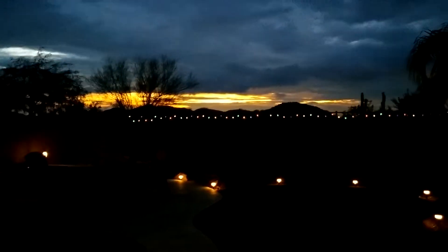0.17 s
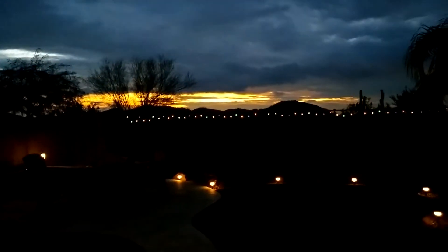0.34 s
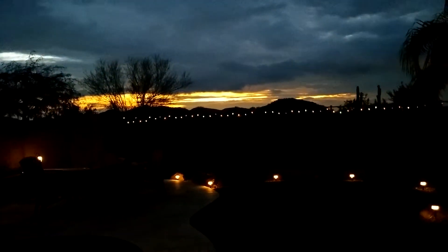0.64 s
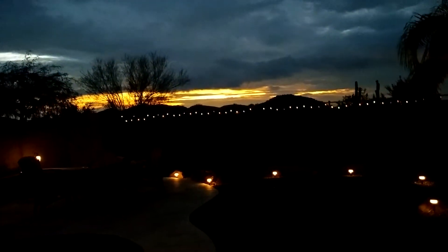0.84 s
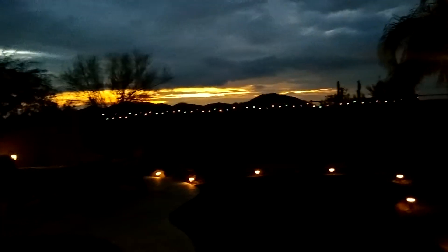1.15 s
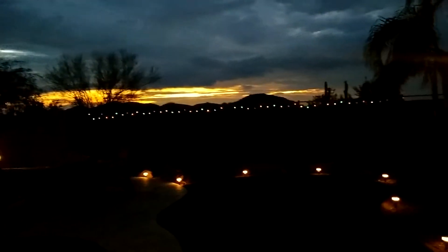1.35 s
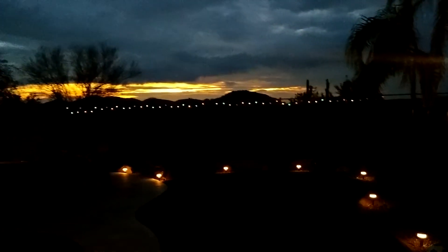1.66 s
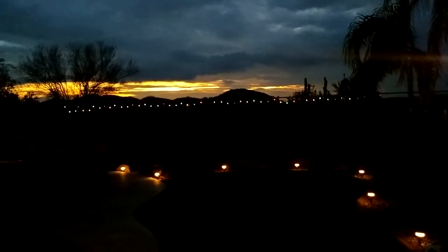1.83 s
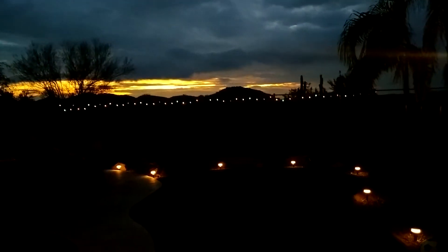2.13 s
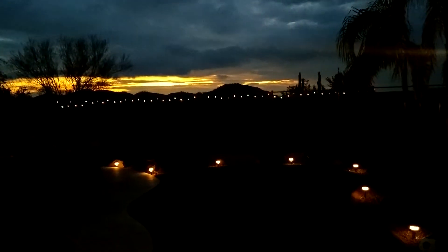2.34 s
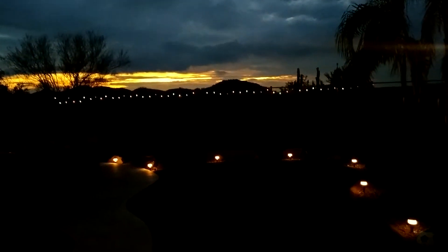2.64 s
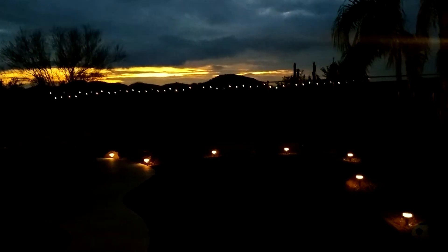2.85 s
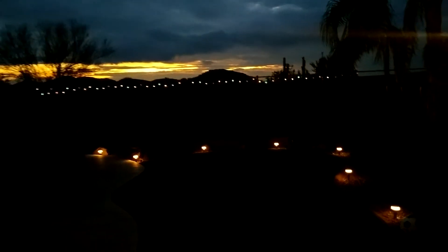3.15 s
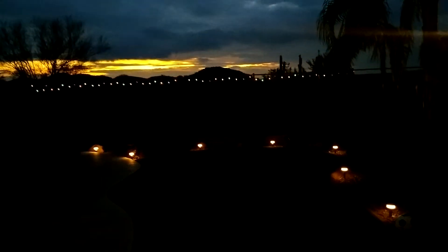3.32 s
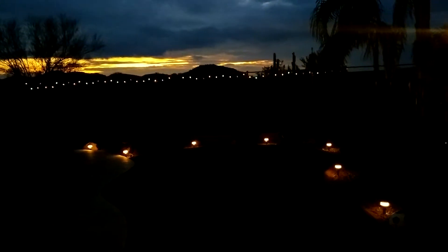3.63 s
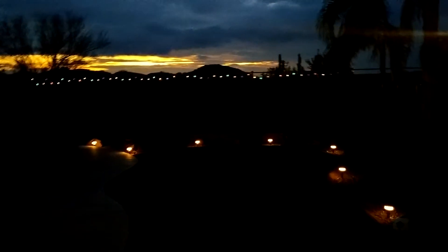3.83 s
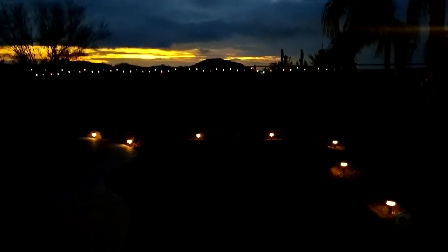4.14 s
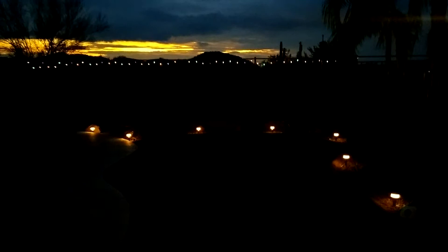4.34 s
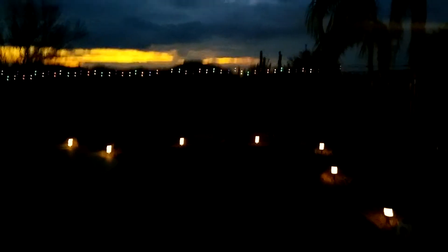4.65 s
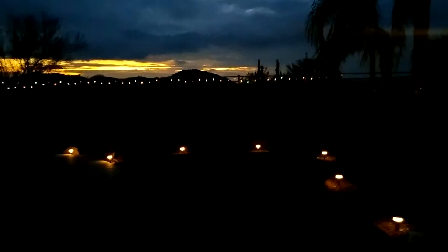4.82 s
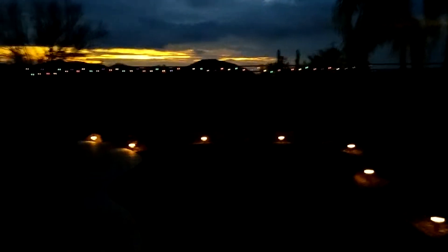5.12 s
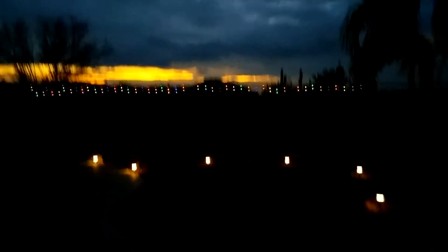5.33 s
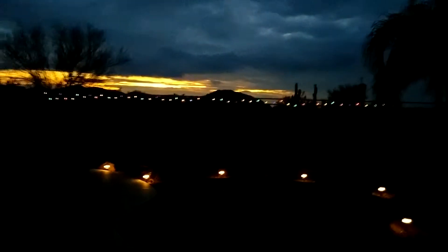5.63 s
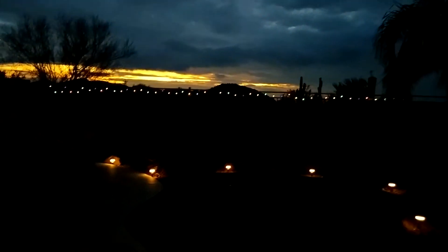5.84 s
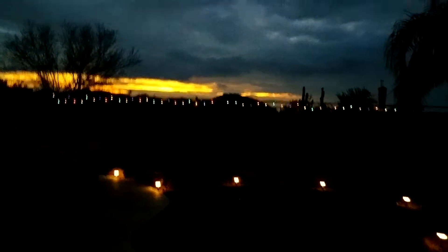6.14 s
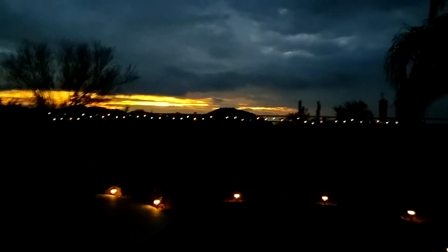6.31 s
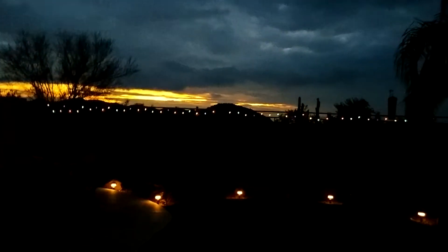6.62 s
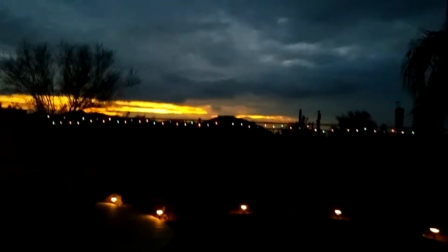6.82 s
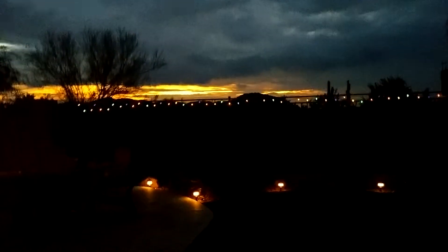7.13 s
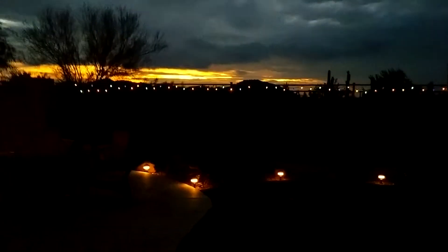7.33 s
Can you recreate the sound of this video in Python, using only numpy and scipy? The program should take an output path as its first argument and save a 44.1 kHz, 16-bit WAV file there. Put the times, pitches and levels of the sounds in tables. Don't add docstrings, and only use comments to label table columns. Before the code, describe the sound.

In a dark backyard, one short climbing coyote call fades to faint night noise, then a stronger yodelling howl echoes amid handling ticks.

```python
import sys
import numpy as np
from scipy import signal
from scipy.fft import rfft, irfft, next_fast_len
from scipy.io import wavfile
from scipy.ndimage import uniform_filter1d

SR = 44100
rng = np.random.default_rng(int(sys.argv[2]) if len(sys.argv) > 2 else 0)


def generate_wav(signal):
    frames = np.transpose(np.atleast_2d(signal))
    scaled = np.clip(frames, -1, 1) * 32767
    pcm = np.round(scaled).astype(np.int16)
    wavfile.write(sys.argv[1], SR, pcm)


def volts_from_decibels(level):
    exponent = np.asarray(level, float) / 20
    return 10 ** exponent


N = 329427

# frequency in Hz, left minus right in dB, lead of the left in radians.
PORTS_WAVER = [(700, 1.8, .45), (1400, 2.5, -.4), (2000, 3, -2.2), (3000, 0, -4.6)]


def unit(x):
    return x / np.sqrt(np.mean(x ** 2))


def curve(rows, outside_db=-120):
    s, *columns = np.transpose(rows)
    return [np.interp(np.arange(N) / SR, s, c, outside_db, outside_db) for c in columns]


def shape_db(points, hz):
    f, db = np.transpose(points)
    return np.interp(np.log(np.maximum(hz, 1)), np.log(f), db)


def walk(rate, size=N):
    k = int(SR / rate)
    steps = np.repeat(rng.standard_normal(size // k + 1), k)
    return 1.28 * uniform_filter1d(uniform_filter1d(steps, k), k)[:size]


def bumps(s, rows):
    middle, half, *sizes = np.transpose(rows)
    return np.array(sizes) @ np.exp(-((s - middle[:, None]) / half[:, None]) ** 2)


def noise(points, alike_hz, wind_hz, flicker_db, count):
    size = next_fast_len(N)
    hz = np.arange(1, size // 2 + 2) * SR / size
    alike = .75 / (1 + (hz / alike_hz) ** 2) / (1 + (wind_hz / hz) ** 2)
    white = rfft(rng.standard_normal((2, size)))
    mid, side = white * volts_from_decibels(shape_db(points, hz)) * np.sqrt([1 + alike, 1 - alike])
    late = np.exp(-2j * np.pi * hz * .00013)
    pair = np.array([mid + side, (mid - side) * late])
    edges = np.geomspace(points[0][0], points[-1][0], count + 1)
    out = np.zeros((2, N))
    for a, b in zip(edges, edges[1:]):
        band = irfft(pair * ((hz >= a) & (hz < b)), size)[:, :N]
        out += volts_from_decibels(flicker_db * walk(9)) * band
    return unit(out)


def suppressor():
    # opens at in seconds, shuts at in seconds, hiss level in dB, last level in dB,
    # release time for 20 dB in seconds.
    openings = [
        (0.775, 0.896, -86, -75.5, .01),
        (0.89, 1.203, -74.5, -73, .012),
        (1.21, 1.604, -82, -81, 0.44),
        (5.36, 5.39, -100, -88, 0.042),
        (5.51, 5.53, -87, -86.5, 0.11),
        (5.665, 6.175, -68.5, -66.5, 0.55),
        (6.3, 6.649, -71, -77, 0.095),
        (6.68, 6.798, -82, -91, .02),
        (6.925, 7.256, -75.5, -81, 0.047),
        (7.312, 7.47, -79.5, -80.5, .05),
    ]
    opening_s, full_db = 0.027, -67
    t = np.arange(N) / SR
    ramps = []
    for a, b, db, end_db, fade in openings:
        times = [a - 3 * opening_s, a, b, b + 3 * fade]
        ramps.append(np.interp(t, times, [db - 60, db, end_db, end_db - 60]))
    return np.max(ramps, axis=0) - full_db


def quiet_night():
    # frequency in Hz, level in dB per Hz.
    night_colour = [(210, -38), (350, -5), (480, -15), (727, -5.5), (850, -15), (1500, -15.5), (2300, -18),
                    (3700, -20), (6000, -21.5), (9000, -19), (11000, -21), (15600, -24)]
    return noise(night_colour, 650, 30, 1.1, count=10) * volts_from_decibels(-74.5)


def traffic_and_wind(gain_db):
    # frequency in Hz, level in dB per Hz.
    traffic_colour = [(65, -45), (110, -2.5), (184, -1), (419, -13.5), (465, -9), (553, -13), (811, -17.5),
                      (977, -23.5), (1570, -29.5), (2160, -25), (2600, -31), (3380, -57.5), (5720, -120)]
    # frequency in Hz, level in dB per Hz.
    gust_colour = [(25, -27), (45, -5.5), (70, -1.5), (100, -4.5), (140, -20), (250, -33.5)]
    # time in seconds, level in dB.
    drift = [(0.0, -46.5), (0.85, -48), (1.4, -42), (1.77, -51), (1.95, -55), (3.0, -55.5), (3.55, -59),
             (4.1, -58), (4.8, -59.5), (5.35, -53.5), (6.0, -53.5), (6.5, -45.5), (6.85, -52), (7.47, -54)]
    # time in seconds, half width in seconds, added
    # rumble in dB, # added wind in dB.
    puffs = [(0.92, .03, 2, -6), (1.14, 0.033, 2.5, -2), (2.962, .03, 7, 17.5), (3.33, 0.074, -2.5, 17.5),
             (3.669, 0.067, 6, 11), (5.78, .04, 5.5, 5), (6.45, 0.053, 4.5, 12), (6.63, 0.047, 8, 15),
             (6.93, 0.019, 12, -3), (7.089, 0.078, -1, 11.5), (7.28, 0.042, 7, 7)]
    rumble_db = curve(drift)[0] + gain_db
    rumble_puff_db, wind_puff_db = bumps(np.arange(N) / SR, puffs)
    traffic = noise(traffic_colour, 2000, 40, 1.8, count=8) * volts_from_decibels(rumble_db + rumble_puff_db)
    wind_db = -68.5 + 1.2 * (rumble_db + 63.5)
    return traffic + noise(gust_colour, 900, 41, 1.8, count=2) * volts_from_decibels(wind_db + wind_puff_db)


def hiss(gate_db):
    # frequency in Hz, level in dB per Hz.
    hiss_colour = [(300, -11), (500, -4.5), (1000, -7), (1600, -13.5), (2400, -12.5), (3500, -20),
                   (6000, -22), (9000, -18.5), (12000, -26), (16000, -26)]
    return noise(hiss_colour, 700, 30, 0.88, count=10) * volts_from_decibels(gate_db - 53.0)


def voice(s, hz, db, second_db, third_db, mouth, tremor_db):
    shake = [tremor_db * walk(45)[(s * SR).astype(int)] for _ in range(3)]
    second_db = second_db + shape_db(mouth, 2 * hz) + 2 * shake[1]
    third_db = third_db + shape_db(mouth, 3 * hz) + 2 * shake[2]
    return np.transpose([s, hz, db + shake[0], second_db, third_db])


def howl(notes, throat, jitter, rough, rasp_db):
    s, *columns = notes.T
    i = np.arange(int(s[0] * SR), int(s[-1] * SR))
    size = len(i)
    hz, first_db, second_db, third_db = (uniform_filter1d(np.interp(i / SR, s, c), size=220) for c in columns)
    phase = 2 * np.pi * np.cumsum(hz * (1 + jitter * walk(120, size))) / SR
    effort_db = uniform_filter1d(np.maximum(second_db, third_db), size=2500)
    stack = volts_from_decibels(first_db) * np.sin(phase)
    overtones_db = [second_db, third_db] + [effort_db + shape_db(throat, k * hz) for k in range(4, 15)]
    for k, db in enumerate(overtones_db, 2):
        smear = np.minimum(rough * np.sqrt(k / 2), .95)
        blur = (walk(110, size) + 1j * walk(110, size)) / np.sqrt(2)
        flutter = np.sqrt(1 - smear ** 2) + smear * blur
        stack += volts_from_decibels(db) * np.imag(flutter * np.exp(1j * (k * phase + k * k)))
    air_hz = np.arange(size // 2 + 1) * SR / size
    breath = rfft(rng.standard_normal(size)) * volts_from_decibels(shape_db(throat, air_hz)) * (air_hz > 900)
    air = unit(irfft(breath, size)) * volts_from_decibels(effort_db + rasp_db)
    out = np.zeros(N)
    out[i] = np.sqrt(2) * (stack + air) * signal.windows.tukey(size, 260 / size)
    return out


def rising_howl():
    # time in seconds, pitch in Hz, effort in dB, mouth brightness in dB.
    rise = [
        (0.775, 489.4, -51, -55),
        (0.799, 526, -35, -47.5),
        (0.84, 645, -37, -44),
        (0.875, 692, -23, -42),
        (0.901, 726, -21, -48),
        (0.905, 726, -28, -44),
    ]
    leap = [
        (0.914, 1170, -33, -46),
        (0.94, 1262, -35, -38),
        (0.976, 1287, -37, -39),
        (0.986, 1045, -31, -41),
        (1.001, 1050, -42, -42),
    ]
    hold = [
        (1.018, 1236, -29, -45),
        (1.046, 1256, -34.5, -40.5),
        (1.09, 1290, -41.5, -47),
        (1.14, 1252, -30, -47.5),
        (1.2, 1284, -44, -54.5),
        (1.44, 1280, -36.5, -56.5),
        (1.552, 1205, -36.5, -57),
    ]
    fall = [
        (1.563, 1080, -38, -70),
        (1.574, 800, -37, -56),
        (1.615, 830, -39, -66),
        (1.63, 860, -65, -80),
    ]
    # frequency in Hz, level in dB.
    mouth = [(1050, -1), (1280, -12), (1480, -5), (1800, -2), (2150, -4), (2550, 0), (3150, -12),
             (3700, -28)]
    # frequency in Hz, level in dB.
    throat = [(1300, -4), (2000, -6), (2500, -14), (3200, -16), (4100, -19), (4800, -32), (5700, -29),
              (6400, -17), (7000, -21), (7700, -29), (8300, -34), (8900, -22), (10000, -42), (14000, -70)]
    at, *columns = np.vstack([rise, leap, hold, fall]).T
    s = np.arange(at[0], at[-1], 1 / 1000)
    hz, db, bright_db = (np.interp(s, at, c) for c in columns)
    line = voice(s, hz, db, bright_db, bright_db, mouth, tremor_db=2.5)
    return howl(line, throat, jitter=.002, rough=.3, rasp_db=-14)


def arrive(x, ports):
    size = next_fast_len(N)
    f, db, lead = np.transpose(ports)
    hz = np.arange(size // 2 + 1) * SR / size
    half = volts_from_decibels(np.interp(hz, f, db) / 2) * np.exp(.5j * np.interp(hz, f, lead))
    both = np.maximum(abs(half + 1 / half) / 2, .45)
    return irfft(rfft(x, size) * np.array([half, 1 / half]) / both, size)[:, :N]


def yard(x):
    t60_s, level_db = 0.49, -5.5
    t = np.arange(int(.9 * SR)) / SR
    sparse = rng.random((3, len(t))) < .03
    shared, left, right = rng.standard_normal((3, len(t))) * sparse
    pair = np.array([shared + .45 * left, np.roll(shared, 4) + .45 * right])
    tail = unit(pair * volts_from_decibels(-60 * t / t60_s) * (t > .008))
    dull = signal.butter(1, 4000, fs=SR, output="sos")
    tail = signal.sosfilt(dull, tail / np.sqrt(len(t)))
    return volts_from_decibels(level_db) * signal.fftconvolve(x[None], tail, axes=1)[:, :N]


def ticks():
    # time in seconds, peak in dB, ring in Hz, treble in dB, decay in seconds.
    touches = [(1.585, -56, 1430, -72.5, 0.084), (2.177, -65, 1600, -59, 0.09),
               (2.956, -69.5, 3574, -61.5, 0.22), (2.974, -74, 760, -84.5, 0.066),
               (3.268, -72, 1400, -78, 0.18), (3.555, -61.5, 4140, -57.5, 0.16),
               (3.563, -59, 1340, -58.5, 0.09), (3.631, -51.5, 1106, -69.5, 0.069),
               (4.178, -61.5, 3110, -75, 0.032), (4.181, -71, 1037, -93.5, 0.69),
               (5.514, -73, 836, -81.5, 0.076), (6.289, -48, 1395, -78, 0.052),
               (6.617, -41, 860, -61, 0.048), (6.915, -49.5, 1493, -85, 0.016),
               (6.932, -46.5, 880, -57.5, 0.032), (6.951, -57, 970, -62, 0.1),
               (6.972, -61.5, 1540, -62.5, 0.17), (7.049, -80, 1470, -67, 0.053),
               (7.192, -50.5, 1157, -70.5, 0.025), (7.245, -66.5, 1670, -67, 0.22),
               (7.302, -63, 3900, -60.5, 0.028), (7.349, -75, 790, -71.5, .03)]
    # time in seconds, left minus right in dB.
    hand_pan = [(1.5, -4), (5.5, -2.5), (6.2, 1), (6.7, 3.5), (6.9, -14), (7.47, -9)]
    out, t = np.zeros((2, N + SR)), np.arange(int(.45 * SR)) / SR
    treble = signal.butter(2, [4000, 11500], "bandpass", fs=SR, output="sos")
    for s, db, hz, treble_db, t60 in touches:
        pan_db = np.interp(s, *np.transpose(hand_pan))
        grit = rng.standard_normal((4, len(t)))
        fade = volts_from_decibels(-60 * t / 0.014) + 1.23 * volts_from_decibels(-60 * t / np.clip(t60, .02, .6))
        fade = fade * np.minimum(t / 0.001, 1)
        ring = signal.butter(1, [hz / 1.2, hz * 1.2], "bandpass", fs=SR, output="sos")
        body = signal.sosfilt(np.vstack([ring, ring]), grit[0] + .6 * grit[1:3])
        scuff = signal.sosfilt(treble, grit[[1, 3]])
        sound = (unit(body) * volts_from_decibels(db) + unit(scuff) * volts_from_decibels(treble_db)) * fade
        out[:, int(s * SR):int(s * SR) + len(t)] += sound * volts_from_decibels([[pan_db / 2], [-pan_db / 2]])
    return out[:, :N]


def far_engine():
    # time in seconds, level in dB.
    drone = [(3.5, -81), (3.556, -106.5), (3.62, -77.5), (4.044, -64.5), (4.462, -69.5), (4.542, -86),
             (4.618, -74.5), (4.7, -83)]
    phase = 2 * np.pi * np.cumsum(198 + 3 * walk(12)) / SR
    return np.sin(phase) * volts_from_decibels(curve(drone)[0] - 1 + 3.5 * walk(22))


def pack():
    # time in seconds, pitch in Hz, level in dB.
    answers = [
        [(4.5, 725.5, -103.5), (4.722, 717.5, -76.5), (4.742, 680, -99), (4.842, 728.9, -101),
         (4.97, 705, -79.5), (5.09, 715, -100), (5.398, 705, -67), (5.5, 710, -91)],
        [(7.1, 675, -76), (7.166, 685, -66), (7.212, 665.2, -91), (7.362, 661, -68), (7.47, 656, -83)],
    ]
    out = np.zeros(N)
    for note in answers:
        hz, db = curve(note)
        blur = .7 + .5 * (walk(30) + 1j * walk(30))
        out += np.sqrt(2) * volts_from_decibels(db) * np.imag(blur * np.exp(2j * np.pi * np.cumsum(hz) / SR))
    return out


def wavering_howl():
    # start in seconds, start pitch in Hz, crest in seconds, crest pitch in Hz.
    swings = [
        (5.615, 480, 5.705, 660),
        (5.79, 510, 5.864, 806),
        (5.912, 570, 6.003, 812),
        (6.052, 672, 6.124, 808),
        (6.182, 678, 6.246, 812),
        (6.318, 664, 6.4, 811),
        (6.446, 572, 6.482, 920),
        (6.51, 610, 6.556, 765),
    ]
    crest_db = [-25.5, -16.5, -18, -22, -20.5, -19.5, -25.5, -18.5]
    swing_bright_db = [-45, -37, -40.5, -41, -37, -38.5, -40, -38.5]
    # place (0 start, 1 crest, 2 next start), level over the crest in dB.
    push = [(0, -25), (.3, -17), (.5, -7), (.7, -4), (.86, 0), (1.15, -4), (1.55, -11), (2, -25)]
    fresh_swings = [0, 1, 7]
    fresh_push = [(0, -30), (.22, -7), (.5, -2), (.75, -3), (.95, 0)]
    # middle in seconds, half length in seconds.
    breaks = [
        (5.757, .036),
        (6.505, .007),
    ]
    # time in seconds, pitch jump in Hz, half width in seconds, fundamental in dB.
    slips = [
        (6.143, 170, .013, -3),
        (6.266, 215, .016, -6),
    ]
    # frequency in Hz, level in dB.
    chest = [(500, -12), (590, -9), (650, -1), (800, 0), (870, -5), (1000, -7)]
    # frequency in Hz, level in dB.
    mouth_away = [(1100, -9), (1350, -2), (1500, -9), (1620, -14.5), (1800, -28.5), (2050, -20),
                  (2400, -16), (2650, -38)]
    # frequency in Hz, level in dB.
    throat_away = [(900, -6), (1400, -1), (1700, -9), (2300, -7), (2700, -25), (3200, -21), (3600, -36),
                   (6000, -48), (14000, -80)]
    last_s, last_hz = 6.632, 665
    start, low_hz, crest, top_hz = np.transpose(swings)
    s = np.arange(start[0], last_s, 1 / 1000)
    turn_s = np.append(np.ravel([start, crest], "F"), last_s)
    turn = np.interp(s, turn_s, np.arange(2 * len(start) + 1))
    k = np.minimum(turn // 2, len(start) - 1).astype(int)
    part = turn - 2 * k
    low = np.where(part < 1, low_hz[k], np.append(low_hz[1:], last_hz)[k])
    bend = np.sin(np.pi / 2 * part)
    height = np.where(part < 1, bend, bend ** 2)
    jump_hz, dip_db = bumps(s, np.array(slips)[:, [0, 2, 1, 3]])
    hz = low + (top_hz[k] - low) * height + jump_hz
    mute_db = -40 * sum(np.exp(-((s - middle) / half) ** 4) for middle, half in breaks)
    swing_db = np.interp(s, crest, crest_db)
    fresh = np.isin(k, fresh_swings) & (part < fresh_push[-1][0])
    fresh_db = np.interp(part, *np.transpose(fresh_push))
    push_db = np.where(fresh, fresh_db, np.interp(part, *np.transpose(push))) + dip_db
    first_db = swing_db + push_db + mute_db + shape_db(chest, hz)
    bright_db = np.interp(s, start, swing_bright_db) + mute_db
    third_db = bright_db + 0.91 * (swing_db + push_db + 29)
    line = voice(s, hz, first_db, bright_db, third_db, mouth_away, tremor_db=2.24)
    return howl(line, throat_away, jitter=.004, rough=.6, rasp_db=-9)


def scene():
    ports_rise = [(700, 1, .2), (1270, 4, -1.9), (2500, -5, -4.3), (4000, -2, -5.4), (6400, -3, -7)]
    gate_db = suppressor()
    gain_db = np.maximum(gate_db, -16)
    first, second = rising_howl(), wavering_howl()
    high_notes = signal.butter(2, 1070, "highpass", fs=SR, output="sos")
    echoes = yard(volts_from_decibels(2.5) * signal.sosfilt(high_notes, first) + second)
    coyote = arrive(first, ports_rise) + arrive(second, PORTS_WAVER) + echoes
    background = quiet_night() + traffic_and_wind(gain_db) + hiss(gate_db) + far_engine()
    return coyote * volts_from_decibels(gain_db) + background + ticks() + arrive(pack(), PORTS_WAVER)


def low_pass(x):
    return signal.sosfilt(signal.butter(12, 16470, fs=SR, output="sos"), x)


def record(dry):
    bass = signal.butter(2, 30, "highpass", fs=SR, output="sos")
    top = signal.ellip(8, .2, 70, 15700, fs=SR, output="sos")
    mix = signal.sosfilt(np.vstack([bass, top]), dry)
    return low_pass(mix)


dry = scene()
out = record(dry)
generate_wav(out)
```